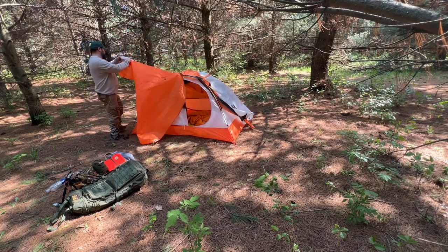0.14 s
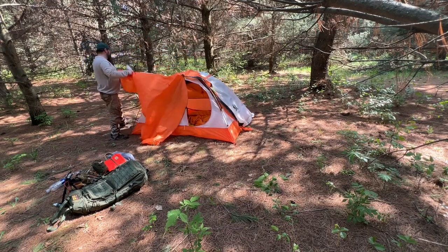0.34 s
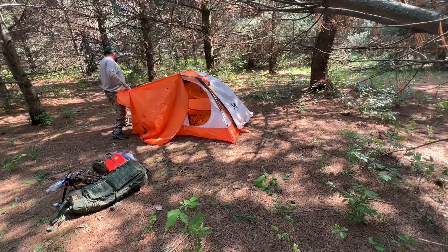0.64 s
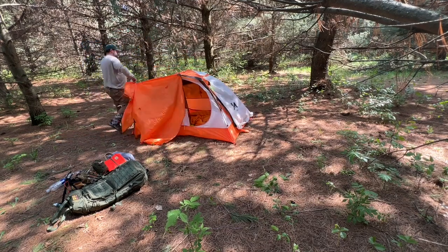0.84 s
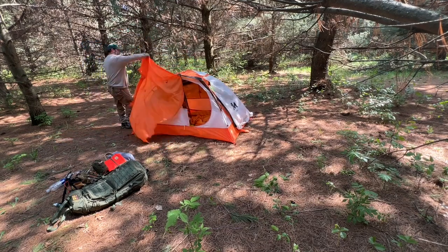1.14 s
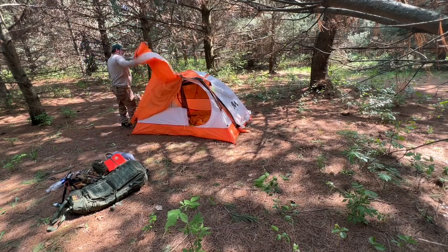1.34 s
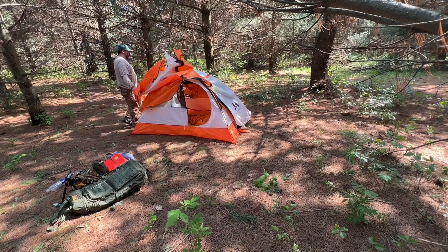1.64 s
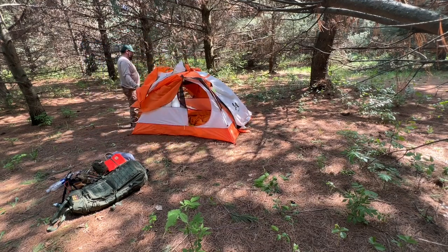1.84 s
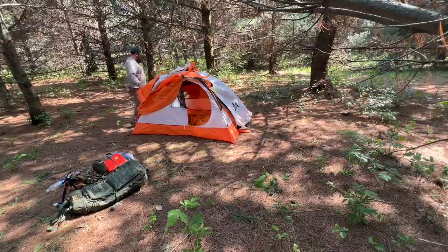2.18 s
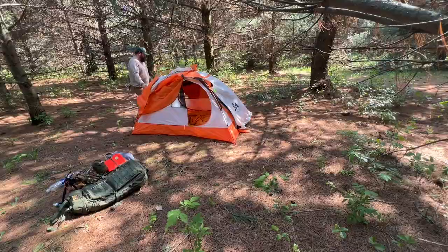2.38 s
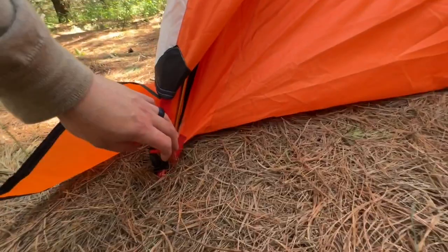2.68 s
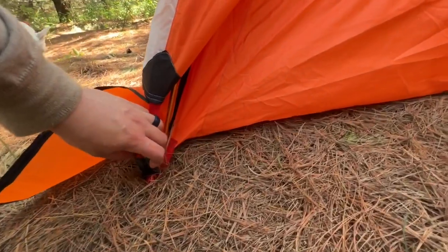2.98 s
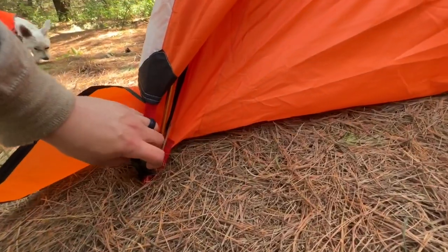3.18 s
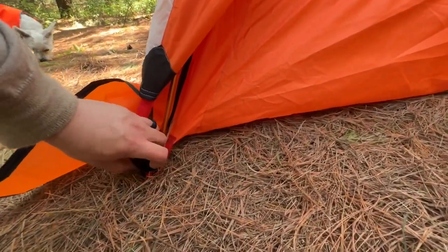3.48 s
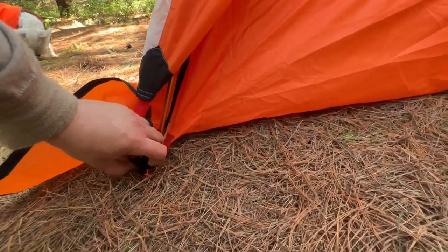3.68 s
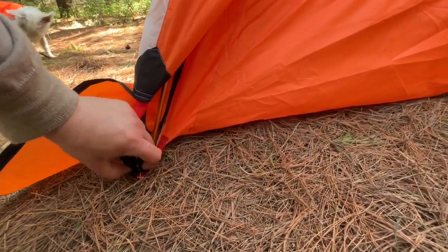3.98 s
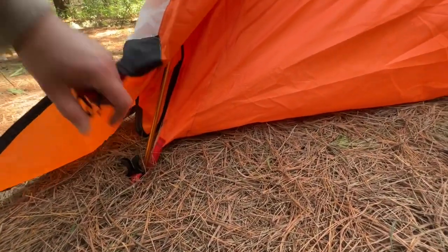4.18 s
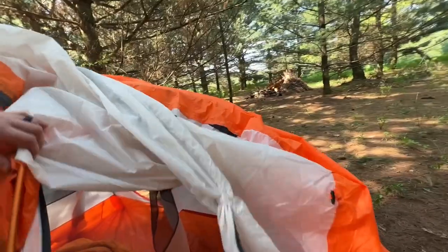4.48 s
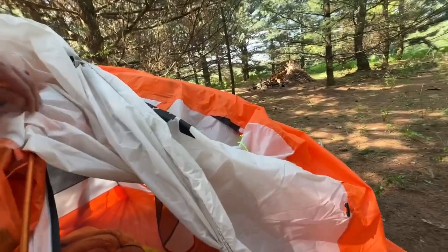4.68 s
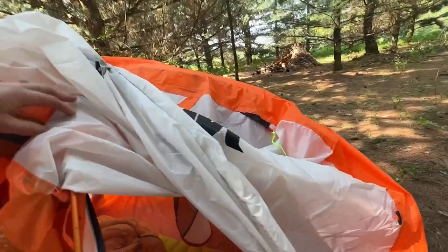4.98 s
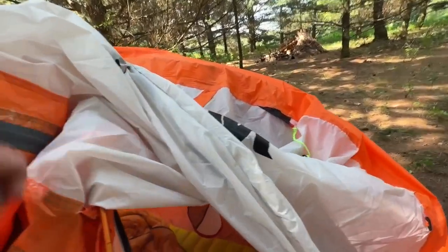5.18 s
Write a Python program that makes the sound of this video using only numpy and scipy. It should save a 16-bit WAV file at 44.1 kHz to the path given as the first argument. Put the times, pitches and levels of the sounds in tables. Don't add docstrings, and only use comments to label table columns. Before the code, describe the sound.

Soft swishing tent cloth outdoors, a quiet close unclipping with bird whistles and scraping webbing, then sudden loud crinkling of bundled nylon.

```python
import sys
import numpy as np
from scipy import signal
from scipy.fft import rfft, irfft, next_fast_len
from scipy.io import wavfile
from scipy.ndimage import uniform_filter1d

SR = 44100
rng = np.random.default_rng(int(sys.argv[2]) if len(sys.argv) > 2 else 0)


def file_out(sig):
    cols = np.atleast_2d(sig).T
    lim = np.clip(cols, -1, 1)
    pcm = np.round(lim * 32767).astype(np.int16)
    wavfile.write(sys.argv[1], SR, pcm)


def invert_db(level):
    return 10 ** (np.asarray(level, dtype=float) / 20)


N = 234826
TIME = np.arange(N) / SR

# t/s, fade out/s, fade in/s
SPLICES = [
    (2.476, 0.043, 0.04),
    (4.378, 0.01, 0.03),
]
SHOT = np.searchsorted([splice[0] for splice in SPLICES], TIME)

# t/s, f/Hz, level/dB
WHISTLES = [
    [(3.08, 3480, -59), (3.1, 3215, -54.5), (3.14, 2780, -55), (3.15, 2660, -62), (3.16, 2490, -76)],
    [(3.43, 3050, -72), (3.458, 2915, -53.5), (3.478, 2920, -59), (3.489, 2940, -64), (3.5, 2935, -50.5),
     (3.53, 2868, -52.5), (3.546, 2774, -55), (3.555, 2620, -56)],
    [(3.81, 3040, -68), (3.838, 2850, -56), (3.86, 2690, -62)],
    [(4.148, 3640, -66), (4.162, 3470, -57), (4.174, 3305, -54), (4.196, 2940, -52.5), (4.226, 2715, -52),
     (4.24, 2570, -58)],
]
# t/s, f/Hz, level/dB
BURRS = [
    [(2.985, 2677, -72), (3.015, 2970, -61), (3.045, 3214, -56.5), (3.066, 3380, -61), (3.082, 3360, -62)],
    [(3.555, 2633, -56), (3.572, 2890, -56), (3.595, 3470, -61), (3.625, 3700, -60), (3.66, 3540, -64)],
    [(3.858, 3200, -52.5), (3.872, 3410, -58), (3.888, 3320, -57), (3.902, 2900, -54), (3.925, 2750, -55),
     (3.95, 2470, -67), (3.99, 2100, -69)],
]
WOOD_T60_S, WOOD_DB, BIRD_PAN_DB = 0.69, -4, -5.5

# t/s, peak level/dB, f/Hz, left minus right/dB
THUDS = [(0.48, -62, 57, 0), (0.69, -61, 65, -1), (1.095, -56, 150, 2), (1.127, -45, 127, 0),
         (1.701, -58, 136, 1), (1.801, -45, 297, 1), (2.239, -58.5, 95, 4), (2.497, -48, 350, -9),
         (2.515, -53, 340, -8), (2.546, -36, 334, -11), (2.566, -39, 283, -5), (2.579, -50.5, 336, -22),
         (2.636, -50, 84.5, -4), (2.648, -51, 110, 0), (2.761, -51.5, 262, 2), (2.77, -59, 60, -4),
         (2.877, -57, 152, -2.5), (3.2, -65, 65.5, -6), (3.525, -51, 342, -11), (3.535, -54, 188, -6),
         (3.865, -63, 83, -3), (3.91, -57, 119, -3), (3.976, -63, 105, -5), (4.258, -44.5, 223, 1),
         (4.398, -32.5, 159, 3), (4.43, -38, 183, 7), (4.447, -25, 315, 6.5), (4.51, -34.5, 278, 0),
         (4.616, -36.5, 157, 9), (4.625, -36.5, 400, 5), (4.672, -47, 200, 3), (4.706, -37.5, 161, 3.5),
         (4.727, -38, 171, 3), (4.79, -44, 62.3, 2)]
THUD_T60_S, THUD_CYCLES = 0.017, 6.4

# t/s, peak level/dB, centre f/Hz, left minus right/dB
SNAPS = [(1.0953, -38.5, 5000, 0), (1.618, -45, 4750, 3), (1.938, -46.5, 4760, 5), (2.997, -40, 8800, -6),
         (3.0674, -54, 6170, -4), (3.7174, -52, 6500, -2), (3.793, -49, 8600, 4), (4.036, -46, 6120, 1),
         (4.234, -40, 8200, -3), (4.2568, -35, 6330, 4), (4.324, -34.5, 6890, 2), (4.3695, -45, 5000, -5),
         (4.4354, -28, 7100, -6), (4.5054, -27.5, 6300, -7), (4.5446, -31.5, 6030, 4),
         (4.5853, -33, 5900, -3), (4.6212, -28.5, 5900, -8), (4.693, -25, 8000, -8),
         (4.7205, -26, 8240, -4), (4.761, -29, 7800, 2), (4.7794, -43, 6300, 2), (4.9677, -24, 7500, -5),
         (5.066, -35, 7440, -13)]
SNAP_WIDTH_HZ, SNAP_MS = 4400, 1.15
# t/s, peak level/dB, centre f/Hz, left minus right/dB
KNOCKS = [(0.681, -49.5, 890, 4), (1.811, -53, 840, 1), (2.516, -53, 1950, -6), (2.549, -51, 700, -8),
          (2.567, -57, 650, -8), (4.436, -30, 2100, 1), (4.585, -33, 1500, 9), (4.594, -36, 2100, 9),
          (4.641, -35, 2100, 3), (4.655, -34, 2200, 3), (4.692, -33.5, 2200, 6), (4.721, -40, 1800, 5),
          (4.845, -40, 1900, 3), (3.683, -50.5, 1580, 3), (2.998, -55, 1390, -5), (3.042, -53, 800, -4),
          (3.086, -56, 900, -4), (4.178, -33.5, 1260, 3), (4.235, -37, 2020, 8), (4.256, -41.5, 1930, 0),
          (4.287, -43, 1600, 9), (4.37, -32, 1200, 2), (4.37, -33, 3000, 2), (4.506, -27.5, 1940, 5),
          (4.5445, -29.5, 2470, 1), (4.7077, -33, 1090, 3), (4.815, -36, 1300, 4), (4.859, -41, 1070, 1),
          (4.967, -35, 2730, -3), (4.984, -43, 880, 5), (5.036, -41.5, 832, 4), (5.067, -33.5, 1330, 3),
          (5.067, -39, 2820, -6), (5.283, -38.5, 1900, 6), (5.317, -35, 796, 2.5)]
KNOCK_WIDTH_HZ, KNOCK_MS = 1470, 1.73
# t/s, peak level/dB, centre f/Hz, length/ms
SLIPS = [(2.877, -62, 4000, 20), (3.222, -49, 8600, 4.3), (3.309, -54, 9000, 1.7), (3.324, -45, 4500, 29),
         (3.35, -48.5, 5000, 21), (3.716, -53, 7960, 12), (3.858, -41, 7000, 9.8), (3.905, -40, 7100, 7.5),
         (3.923, -40, 8600, 4.9), (4.033, -49, 8800, 20)]
SLIP_WIDTH_HZ, SLIP_PAN_DB = 7500, -6.5
# t/s, peak level/dB, centre f/Hz, left minus right/dB
PRICKS = [(0.0408, -42, 4430, 4.5), (0.414, -39, 6450, 4.0), (0.4314, -46, 5620, 4.0),
          (0.6804, -48, 3780, 3.0), (0.7352, -43, 4450, 6.0), (0.8036, -52, 5550, 3),
          (0.8355, -51, 4790, 5.5), (0.8744, -47, 4510, 5.0), (1.0321, -49, 5160, 5.5),
          (1.0585, -47, 5390, 4.5), (1.1704, -50, 5240, 3.0), (1.4014, -35, 3680, 3.5),
          (1.4514, -49, 4640, 3.5), (1.6671, -42, 4710, 4.0), (2.4942, -55, 5830, -7.0),
          (2.5184, -57, 6580, -7.0), (2.8843, -46, 7320, -6.5), (4.3231, -36, 6890, -6.5),
          (4.4004, -31, 5340, -5.5), (4.4504, -25, 7180, -5.5), (4.4784, -33, 6470, -7.0),
          (4.4924, -24, 6900, -7.0), (4.5104, -35, 5540, -7.5), (4.5364, -37, 6230, -7.5),
          (4.5441, -30, 6070, -4.5), (4.5964, -34, 6320, -7.5), (4.6084, -26, 5820, -7.0),
          (4.6254, -33, 6060, -8.5), (4.6404, -40, 6230, -5.0), (4.6544, -34, 8300, -3.5),
          (4.6743, -27, 6110, -5.0), (4.7084, -28, 6040, -4.0), (4.7314, -32, 6050, -4.0),
          (4.7654, -27, 5600, -6.0), (4.815, -41, 6270, -4.5), (4.8444, -35, 6000, -4.5)]
PRICK_WIDTH_HZ, PRICK_MS, PRICK_DB = 3700, 1, -5.5
SPIKE = 4.5

# t/s, effort level/dB, slack/dB
HANDS = [
    [(0.01, -63, 3.5), (0.34, -64.5, -0.5), (0.7, -68, 3.5), (0.87, -71, 7), (1.04, -69, 5), (1.5, -62, -1),
     (1.9, -66.5, 0), (2.44, -69.5, -2.5)],
    [(2.52, -63, 4.5), (2.7, -73, 4), (3.28, -91, 6), (3.82, -76, -1), (3.96, -70, -7), (4.07, -54, -6),
     (4.36, -65.5, 14)],
    [(4.41, -46, 1), (5.02, -59.5, 2), (5.31, -68.5, 5.5)],
]
# t/s, hold/s, strength level/dB, slack/dB
TUGS = [(0.2, 0.026, -72, -4), (0.482, 0.079, -62, -1.5), (0.61, 0.04, -68, -0.5), (1.06, .02, -63, 3),
        (1.092, 0.044, -59.5, 7), (1.15, 0.072, -54, -4), (1.255, .11, -55, 0.5), (1.398, 0.037, -62, 0),
        (1.645, 0.065, -64.5, -3), (1.796, .03, -70.5, 9), (2.3, 0.036, -70.5, 1), (2.64, 0.018, -73, 9),
        (2.764, 0.054, -72, -1.5), (2.885, 0.053, -61, -2), (2.963, 0.091, -68.5, 0.5),
        (3.164, 0.026, -68, -19), (3.228, 0.014, -66.5, -3), (3.326, 0.045, -65, 0.5),
        (3.595, 0.1, -73.5, -1), (3.708, 0.036, -63.5, -11), (3.859, 0.026, -63, -6),
        (4.157, 0.023, -54.5, -7.5), (4.256, 0.025, -53, -4), (4.325, 0.012, -53, 0),
        (4.405, 0.038, -46.5, -2.5), (4.467, 0.027, -45, -1.5), (4.587, 0.036, -42, -3.5),
        (4.702, 0.12, -53, -4.5), (4.937, 0.03, -53, -1.5), (5.058, 0.012, -59.5, 2.5),
        (5.287, 0.024, -65, -5)]
TUG_ATTACK_S, TUG_RELEASE_S, TUG_EASE = 0.011, 0.035, 0.34

# rate/(1/s), size spread/dB, level against sliding/dB, flutter/dB
CREASES = [
    (950, 1, -6, 0.5),
    (594, 6.5, -5, -1.5),
    (1200, 5.5, -5.5, 0.5),
]
PUCKER_RATE, PUCKER_DB = 40, -21
# f/Hz, level/dB per Hz
COLOURS = [
    [(30, -21), (61, 1), (297, -5.5), (1730, -8.5), (2750, -2), (3610, -8), (7000, -15), (8400, -13.5)],
    [(30, -17), (60, -2), (130, -7), (298, -4), (1630, -2), (2730, -4), (4570, -14), (8250, -14)],
    [(30, -16), (60, 6.5), (130, 0), (604, 3.5), (2680, 0), (4920, -11), (5700, -8), (8400, -8)],
]
# f/Hz, width/Hz, level/dB
RINGS = [
    [(142, 16, 4), (1000, 320, 1.5), (1750, 58, 5), (3000, 1600, -1.5)],
    [(145, 61, 5), (544, 150, -2.5), (1040, 440, 6.5), (1900, 750, 9.5)],
    [(162, 24, 3), (973, 135, 7), (1190, 230, -1.5), (1940, 1000, 5.5)],
]
# f/Hz, level/dB per Hz
SIZZLE = [(9100, -9.5), (10300, 2.5), (11500, -3.5), (12600, -12), (13600, -9.5), (15600, -9.5)]
# f/Hz, left minus right/dB, likeness/(0-1), right phase/rad
PORTS = [
    [(60.6, 1.5, 0.99, .5), (292, 2.5, 0.88, 0.56), (580, 1.5, 0.8, -1.67), (990, 7.5, 0.6, -1.5),
     (2826, 1.5, 0.94, -2.5), (3300, 2.5, 0.29, -2.5), (5600, 9, 0.4, -7), (8600, -3, 0.13, -1.5)],
    [(60, -4, 0.92, -1.1), (298, -2, 0.33, 0.37), (570, 3.5, 0.3, -2), (1630, -3.5, 0.12, 0.94),
     (4500, -4, 0, -1.8), (6130, -14.5, 0.35, -1.3), (7000, -7.5, 0, -1.3), (8100, -2.5, 0.7, -1.5)],
    [(110, 2, 0.84, -0.7), (291, 2, 0.7, -0.7), (604, 7, 0.67, -2), (1780, 3.5, 0.04, -1.5),
     (3670, -2.5, 0.67, -3), (5900, -14.5, .26, 2.5), (7000, -4.5, 0.1, -8.5), (8700, 1, 0.75, -5.5)],
]

SPLIT_HZ = (450, 2900, 9200)
BAND_LAW = [
    [(1.2, -0.0254), (0.51, -0.1), (0.08, -0.03), (-0.7, 0.11)],
    [(1.98, 0.09), (0.5, -0.0842), (0.14, 0), (0.5, 0.28)],
    [(1.3, -0.14), (1.23, -0.0347), (0.26, -0.0454), (0, 0.03)],
]
# flap/dB, sheet/dB, crinkle/dB, sizzle/dB
BAND_DB = [(-1, 2.5, 0.96, -4), (-5, -2, 1.26, -9.5), (-3.5, -0.5, 2.24, -4)]
# flap level/dB, sheet level/dB, crinkle level/dB, sizzle level/dB
HUSH_DB = [(-80, -71, -78.5, -103), (-78, -72, -75, -93), (-58.5, -64, -62.5, -84)]

HISS_DB = -100
SIZZLE_TURN_HZ, SIZZLE_START_HZ = 1750, 8650
APART_DB = (-18, -21, -22)
# f/Hz, level/dB
TOP = [(9200, 0), (15750, 4), (15950, -26), (16600, -47)]


def unit(x):
    return x / np.sqrt(np.mean(np.mean(np.atleast_2d(x), axis=0) ** 2))


def walk(rate):
    k = int(SR / rate)
    steps = np.repeat(rng.standard_normal(N // k + 1), k)
    return 1.3 * uniform_filter1d(uniform_filter1d(steps, k), k)[:N]


def band(x, centre_hz, width_hz):
    return signal.lfilter(*signal.iirpeak(centre_hz, max(centre_hz / width_hz, 0.5), fs=SR), x)


def sides(pan_db):
    return invert_db(np.array([[pan_db], [-pan_db]]) / 2)


def note(rows, rate_hz, swing_hz, throb):
    s, hz, db = np.transpose(rows)
    wobble = np.sin(2 * np.pi * np.cumsum(rate_hz * (1 + 0.22 * walk(60))) / SR)
    pitch = np.interp(TIME, s, hz) + swing_hz * (wobble + 0.246 * walk(500)) + 12 * walk(120)
    edge = np.clip(np.minimum(TIME - s[0], s[-1] - TIME) / 0.006 + 0.5, 0, 1)
    level = invert_db(np.interp(TIME, s, db) + 2.2 * walk(90)) * edge * (1 + throb * wobble)
    return np.sqrt(2) * level * np.sin(2 * np.pi * np.cumsum(pitch) / SR)


def bird():
    song = sum(note(rows, 0, 0, 0) for rows in WHISTLES)
    for rows, rate_hz, swing_hz in zip(BURRS, (66, 150, 140), (270, 190, 110)):
        song = song + note(rows, rate_hz, swing_hz, 0.25)
    t = np.arange(SR) / SR
    fade = np.exp(-np.log(1000) * t / WOOD_T60_S) * (1 - np.exp(-(t / 0.0094) ** 2))
    trunks = rng.standard_normal((2, SR)) * fade
    trunks = trunks / np.sqrt(np.sum(trunks[0] ** 2))
    tail = signal.fftconvolve(song[None], trunks, axes=1)[:, :N]
    return (song + invert_db(WOOD_DB) * tail) * sides(BIRD_PAN_DB)


def thuds():
    size = 8192
    out, t = np.zeros((2, N + size)), np.arange(size) / SR
    port_lag = np.array([[0], [1.5]])
    for s, peak_db, hz, pan_db in THUDS:
        t60 = THUD_T60_S + THUD_CYCLES / hz
        shape = (1 - np.exp(-t / 0.0028)) * np.exp(-np.log(1000) * t / t60) * sides(pan_db)
        cycles = hz * (t + 0.11 * 0.0083 * (1 - np.exp(-t / 0.0012)))
        i = int(s * SR)
        for ratio, mode_db in ((1, 0.5), (1.37, -7), (1.85, -13.5)):
            wave = np.sin(2 * np.pi * ratio * cycles - port_lag)
            out[:, i:i + size] += invert_db(peak_db + mode_db + 2.5) * shape * wave
    return out[:, :N]


def snaps():
    events = [(*row[:3], SNAP_WIDTH_HZ, SNAP_MS, row[3], 1) for row in SNAPS]
    events += [(*row[:3], KNOCK_WIDTH_HZ, KNOCK_MS, row[3], 1) for row in KNOCKS]
    events += [(*row[:3], SLIP_WIDTH_HZ, row[3], SLIP_PAN_DB, 4) for row in SLIPS]
    events += [(s, db + PRICK_DB, hz, PRICK_WIDTH_HZ, PRICK_MS, pan_db, 1) for s, db, hz, pan_db in PRICKS]
    size = 2048
    out, t = np.zeros((2, N + size)), np.arange(size) / SR
    for s, peak_db, hz, width_hz, ms, pan_db, order in events:
        noise = rng.standard_normal((3, size))
        rise = np.minimum(t / (ms / 4000), 1) if order > 1 else 1
        decay = np.exp(-(t / (ms / 1000)) ** order)
        crack = (noise[0] + 0.79 * noise[1:] + SPIKE * (t == 0)) * rise * decay
        ring = band(band(crack, hz, width_hz), hz, 0.81 * width_hz)
        ring = ring / np.abs(ring.mean(axis=0)).max()
        i = int(s * SR)
        out[:, i:i + size] += ring * invert_db(peak_db) * sides(pan_db)
    return out[:, :N]


def hands():
    curves = [np.transpose(rows) for rows in HANDS]
    effort_db = np.choose(SHOT, [np.interp(TIME, s, effort) for s, effort, _ in curves])
    slack_db = np.choose(SHOT, [np.interp(TIME, s, slack) for s, _, slack in curves])
    power = invert_db(2 * effort_db)
    slack = power * slack_db
    for s, hold_s, db, loose_db in TUGS:
        attack_s, release_s = TUG_ATTACK_S + TUG_EASE * hold_s, TUG_RELEASE_S + TUG_EASE * hold_s
        rise = np.clip((TIME - s) / attack_s + 1, 0, 1)
        fall = np.exp(-np.maximum(TIME - s - hold_s, 0) / release_s)
        tug = invert_db(2 * db) * (rise * fall) ** 2
        power = power + tug
        slack = slack + tug * loose_db
    return 10 * np.log10(power), slack / power


def puckers(n):
    out = np.zeros((2, n))
    for hz in 400 * 2 ** np.arange(0, 4.4, 0.4):
        sizes = invert_db(2.5 * np.minimum(rng.exponential(size=n), 2.5))
        pops = (rng.random(n) < PUCKER_RATE / SR) * sizes
        push = uniform_filter1d(pops, int(8 * SR / hz)) * rng.standard_normal((2, n))
        out = out + unit(band(band(push, hz, hz / 4.0), hz, hz / 4.3)) * np.sqrt(hz / 2000)
    return out


def rustle(n, rate, spread_db, share_db):
    sizes = invert_db(spread_db * np.minimum(rng.exponential(size=n), 3))
    pops = (rng.random(n) < rate / SR) * sizes
    burst = signal.lfilter([1], [1, -np.exp(-1 / (0.00087 * SR))], pops)
    crackle = invert_db(share_db) * unit(burst) * rng.standard_normal((2, n))
    sliding = rng.standard_normal((2, n))
    return sliding + crackle + invert_db(PUCKER_DB + share_db) * puckers(n)


def ports(pair, colour, table, rings):
    hz = np.arange(pair.shape[1] // 2 + 1) * SR / pair.shape[1] + 1
    colour_hz, colour_db = np.transpose(colour)
    db = np.interp(np.log(hz), np.log(colour_hz), colour_db) + np.interp(hz, *np.transpose(SIZZLE))
    for centre_hz, width_hz, ring_db in rings:
        db = db + ring_db / (1 + (2 * (hz - centre_hz) / width_hz) ** 2)
    port_hz, *columns = np.transpose(table)
    pan_db, like, phase = (np.interp(np.log(hz), np.log(port_hz), column) for column in columns)
    like = np.clip(like, 0, 1)
    a, b = rfft(pair)
    right = like * np.exp(1j * phase) * a + np.sqrt(1 - like ** 2) * b
    return hz, invert_db(db) * np.array([a * invert_db(pan_db / 2), right * invert_db(-pan_db / 2)])


def cloth():
    out = np.zeros((2, N))
    effort_db, slack_db = hands()
    cuts = [0] + [int(splice[0] * SR) for splice in SPLICES] + [N]
    for k, (rate, spread_db, share_db, flutter_db) in enumerate(CREASES):
        span = slice(cuts[k], cuts[k + 1])
        n = next_fast_len(cuts[k + 1] - cuts[k])
        work_db = effort_db[span]
        hz, broad = ports(rustle(n, rate, spread_db, share_db), COLOURS[k], PORTS[k], RINGS[k])
        _, tight = ports(rustle(n, rate, spread_db, share_db), COLOURS[k], PORTS[k], RINGS[k])
        below = [0] + [1 / (1 + (hz / f) ** order) for f, order in zip(SPLIT_HZ, (4, 6, 40))] + [1]
        flutter = walk(16)[span]
        for j, (by_slack, by_effort) in enumerate(BAND_LAW[k]):
            folds = broad if j < 2 else tight
            part = unit(irfft(folds * (below[j + 1] - below[j]), n))[:, :len(work_db)]
            db = work_db + by_slack * slack_db[span] + by_effort * (work_db - work_db.mean())
            shake_db = flutter_db * (0.25 * flutter + 0.93 * walk(24.88)[span])
            moved = invert_db(db + BAND_DB[k][j] + shake_db)
            out[:, span] += part * np.hypot(moved, invert_db(HUSH_DB[k][j]))
    return out


def scene():
    gain = np.ones(N)
    for s, out_s, in_s in SPLICES:
        gain = gain * np.clip(np.maximum((s - TIME) / out_s, (TIME - s) / in_s), 0, 1)
    return (bird() + thuds() + snaps() + cloth()) * gain


def roll_off(x):
    return signal.sosfilt(signal.butter(12, 16510, fs=SR, output="sos"), x)


def record(dry):
    n = next_fast_len(N + 4096)
    left, right = rfft(dry + invert_db(HISS_DB) * rng.standard_normal(dry.shape), n)
    hz = np.arange(len(left)) * SR / n
    turn = (hz - SIZZLE_START_HZ) / SIZZLE_TURN_HZ
    phase = -np.pi * (np.round(turn) + 4 * (turn - np.round(turn)) ** 3)
    shared = (left + right) / np.sqrt(2)
    top = hz > SPLIT_HZ[2]
    cut = invert_db(np.interp(hz, *np.transpose(TOP)))
    both = np.array([np.where(top, shared, left), np.where(top, shared * np.exp(1j * phase), right)])
    apart = irfft(top * (left - right) * cut * (SPLIT_HZ[2] / (hz + 1)) ** -0.6, n)[:N]
    apart = apart * invert_db(np.array(APART_DB)[SHOT] + 4 * walk(30))
    wet = irfft(both * cut, n)[:, :N] + apart * np.array([[0], [1]])
    return roll_off(wet)


dry = scene()
out = record(dry)
file_out(out)
```